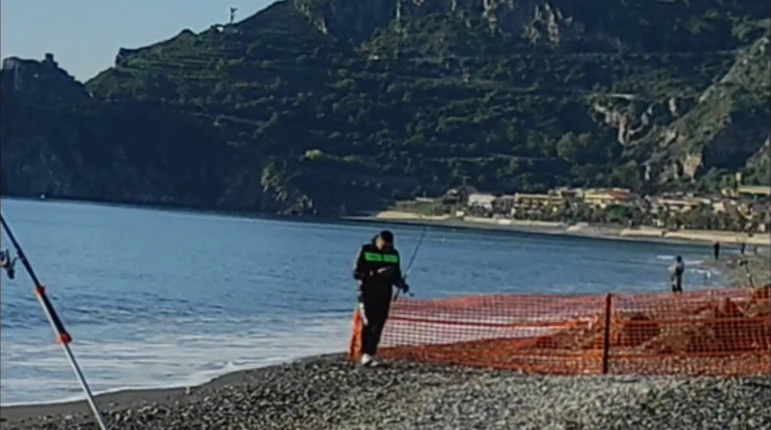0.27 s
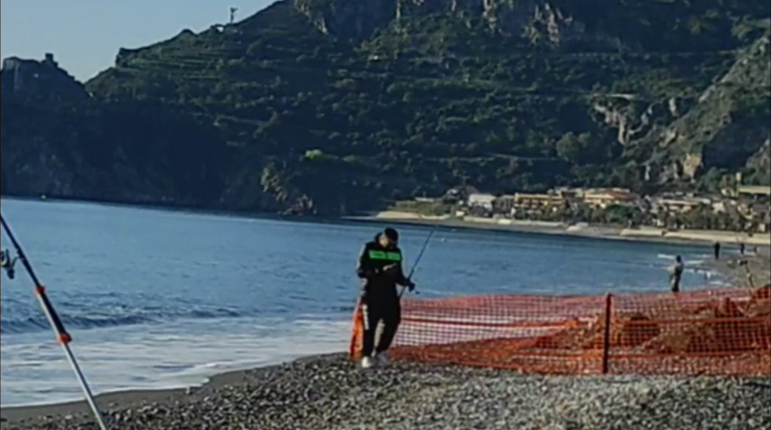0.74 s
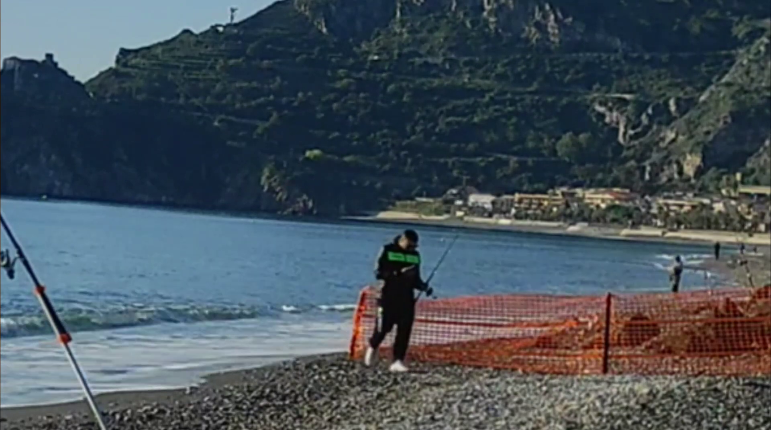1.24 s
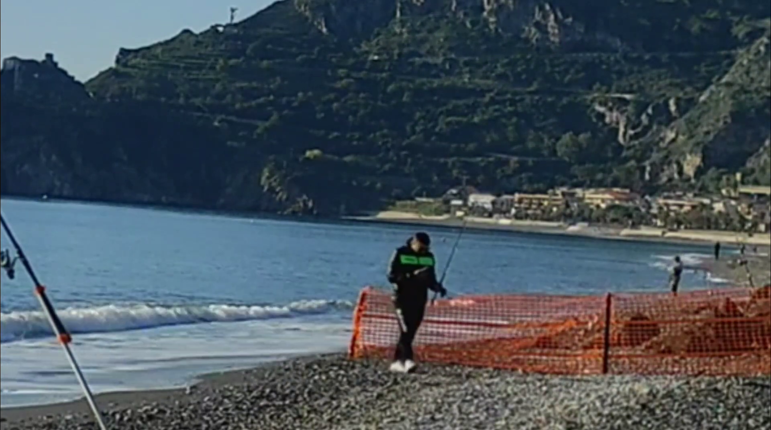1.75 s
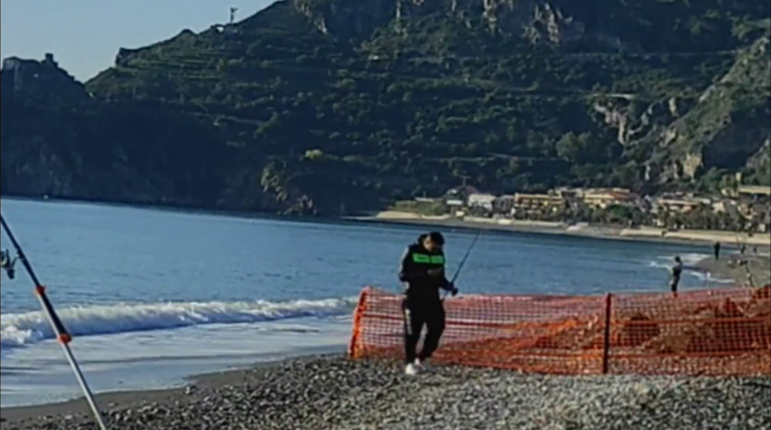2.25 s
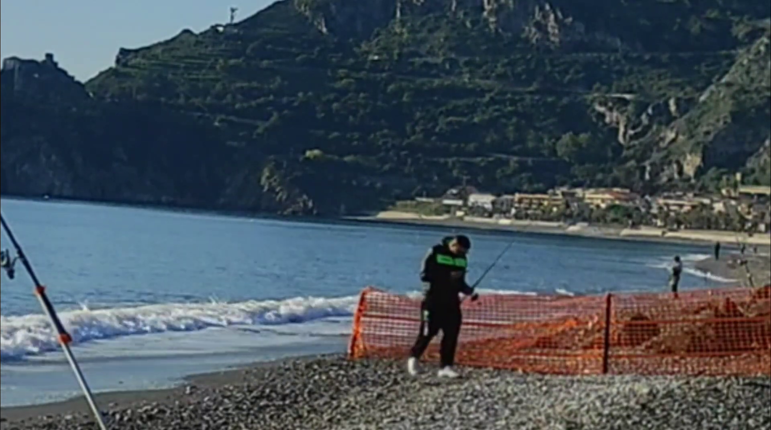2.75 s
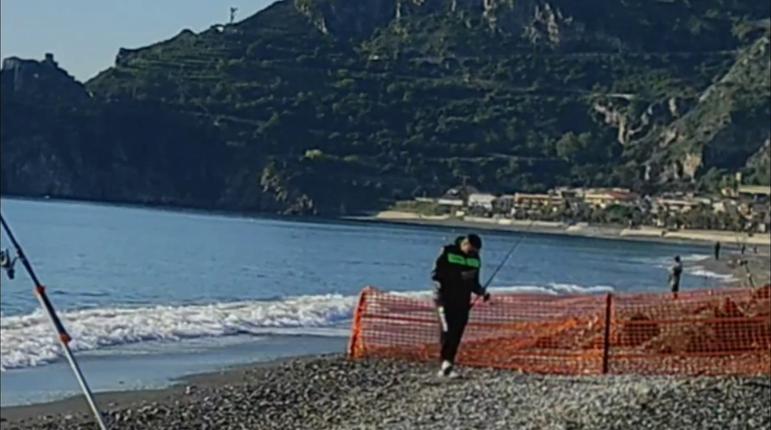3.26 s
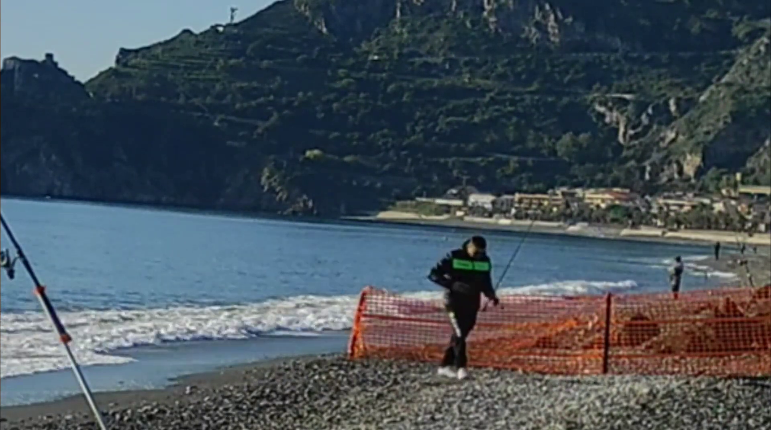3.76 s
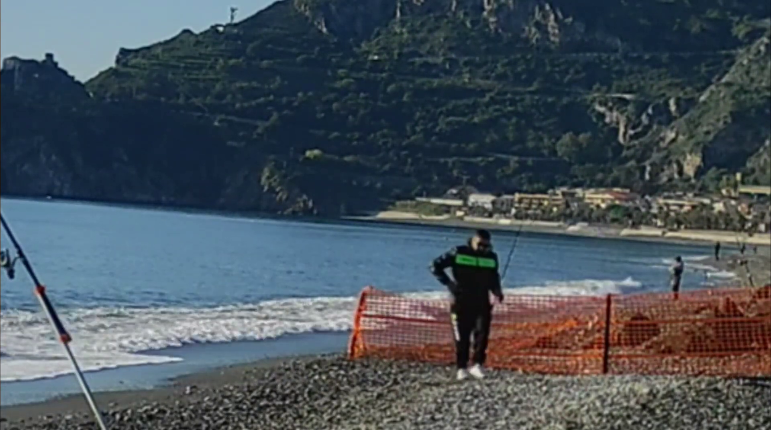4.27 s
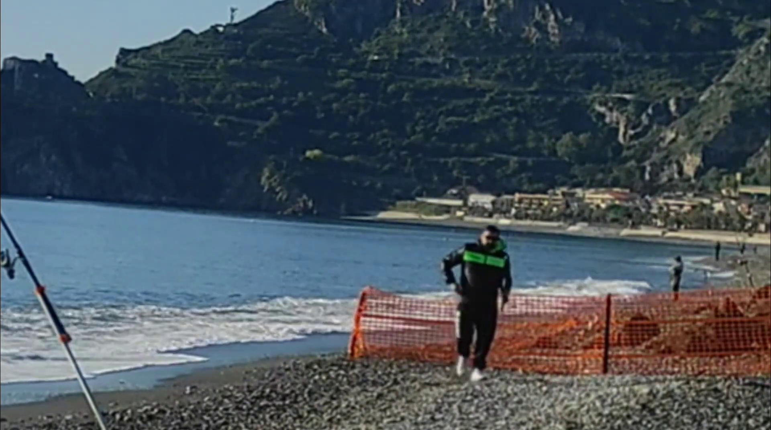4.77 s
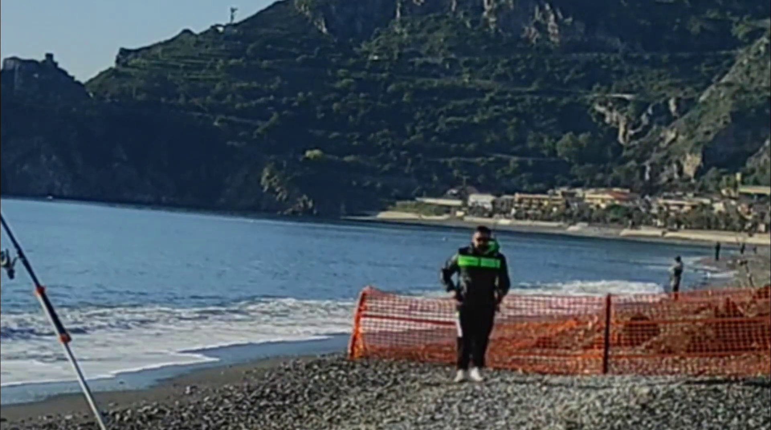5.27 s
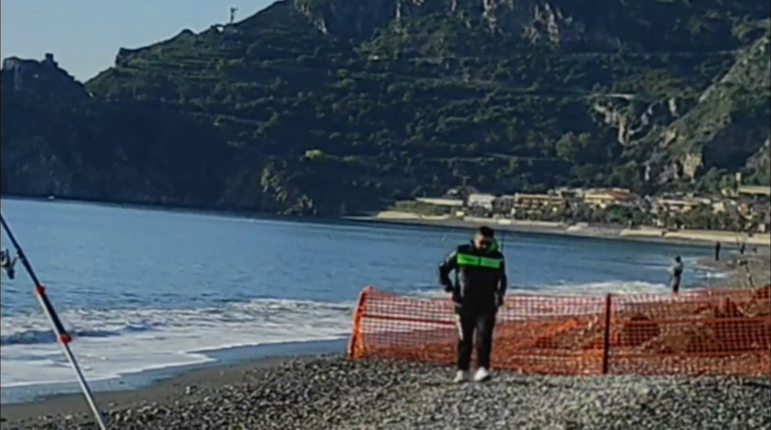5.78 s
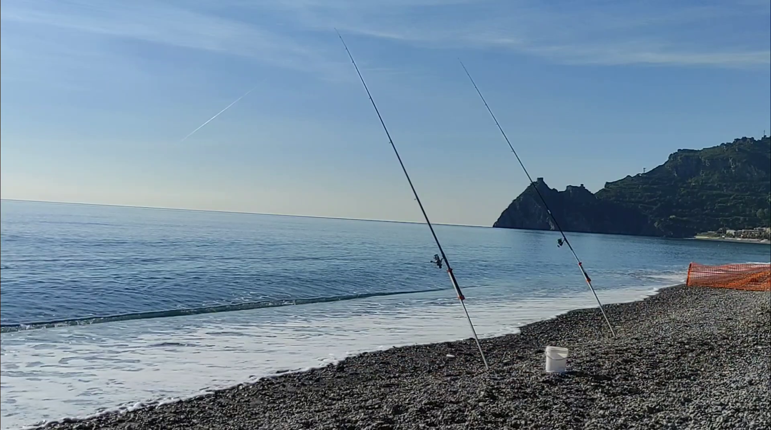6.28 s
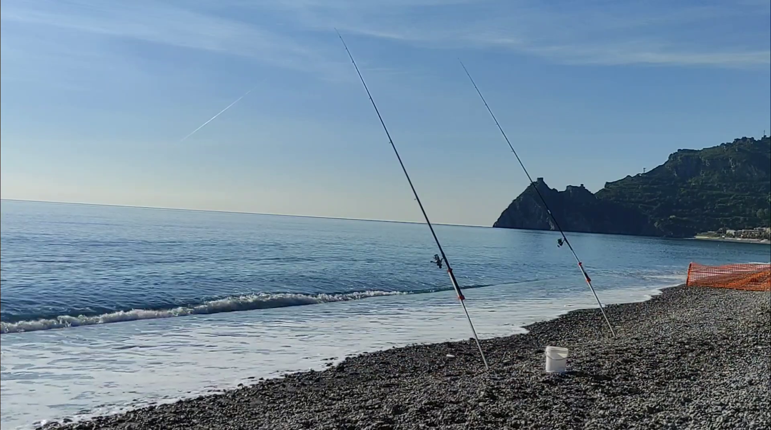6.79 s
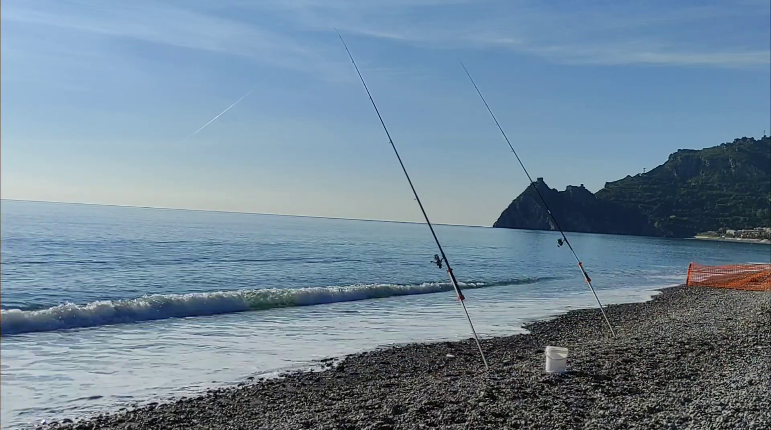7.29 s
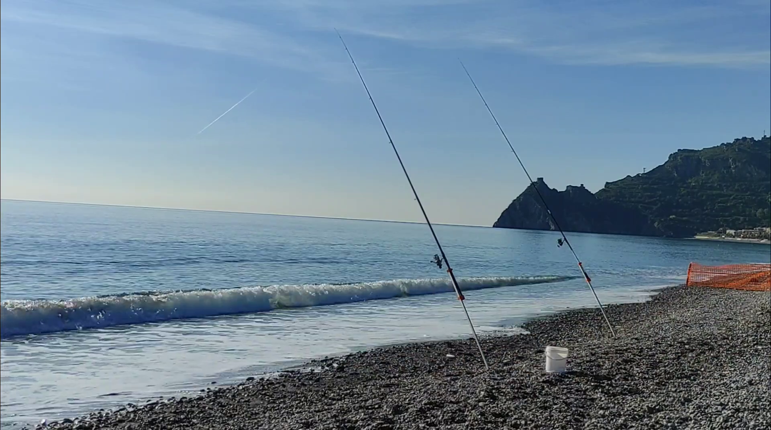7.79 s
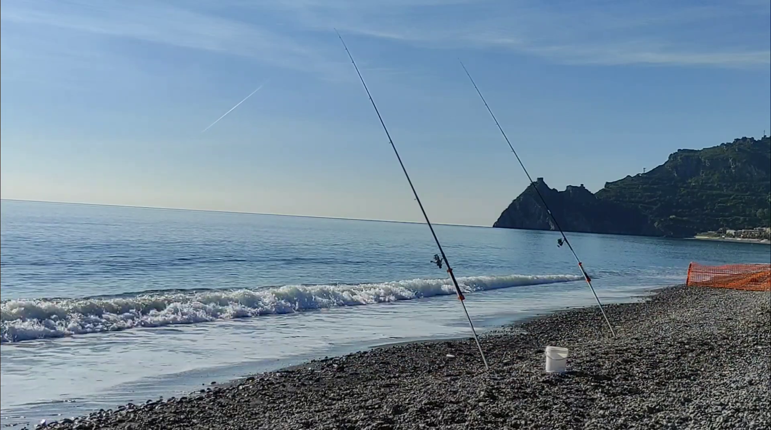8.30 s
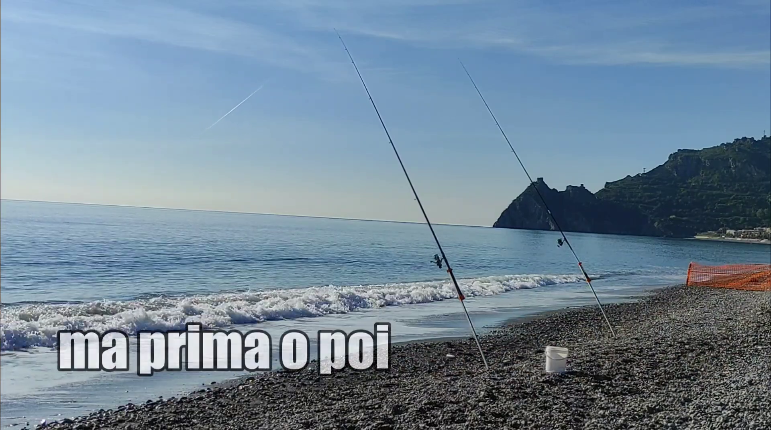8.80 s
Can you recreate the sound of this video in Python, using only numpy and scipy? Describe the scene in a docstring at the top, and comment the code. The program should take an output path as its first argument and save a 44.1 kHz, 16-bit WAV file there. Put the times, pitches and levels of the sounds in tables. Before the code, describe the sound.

Small sea waves break and roar on a pebble beach, foam hissing and fizzing through the stones, with a split-second dropout before the last waves.

```python
"""A breaker booms and roars with trapped air, a few metres off a pebble beach; more small waves follow it.
Foam hisses up the shingle, fizzes between the stones and rolls pebbles up and back; a crest peels along the shore.
Clouds of bubbles are shaped noise; single bubbles and stones are short decaying rings.
The near surf lies to the right of a two-port microphone, the bay ahead, with a light breeze on both ports.
The sound drops out for an instant near 6.06 s, before the last waves."""
import sys
import numpy as np
from scipy import signal
from scipy.fft import rfft, irfft, next_fast_len
from scipy.io import wavfile

SR = 44100
rng = np.random.default_rng(int(sys.argv[2]) if len(sys.argv) > 2 else 0)


def store_wav(level_fs):
    """Save 16-bit WAV to argv[1]."""
    pcm = np.round(np.clip(np.atleast_2d(level_fs), -1, 1) * 32767)
    wavfile.write(sys.argv[1], SR, pcm.T.astype(np.int16))


N = 398663

# Source levels are those ahead of the microphone colour and the gain curve in record().
# Breakers a few metres off. Each row: breaks at in seconds, fullest at in seconds, starts to ebb at in seconds,
# first rise in dB per second (on top of the build-up), build-up in dB per second,
# boom of large air pockets in dB, roar of bubbles in dB, pitch of the roar as a factor.
BREAKERS = [(0.0, 0.95, 0.97, 41, 3.5, -45, -33.5, 0.94), (4.48, 5.88, 7.2, 90, 5.3, -47.3, -34, 1.0),
            (6.835, 6.97, 6.94, 80, 4, -46, -38.5, 0.91), (7.58, 7.75, 7.7, 60.5, 14, -52, -38, 0.85),
            (8.1, 8.6, 8.68, 33, 9, -39.3, -29.5, 0.9)]
# Large air pockets collapsing in a breaker. Each row: centre in seconds, level in dB, pitch in Hz,
# half length in seconds.
AIR_POCKETS = [(0.04, -37, 445, 0.06), (0.11, -41.5, 171, 0.08), (0.42, -43, 166, 0.07),
               (0.78, -44, 175, 0.07), (0.94, -40, 320, 0.052), (1.13, -41, 320, 0.04),
               (1.3, -43, 199, 0.039), (1.51, -43.5, 271, 0.08), (1.98, -49, 436, 0.13),
               (4.6, -41.5, 190, 0.06), (4.93, -42.5, 270, 0.12), (5.33, -45.5, 260, 0.13),
               (5.62, -49, 181, 0.07), (5.81, -45, 400, 0.09), (6.0, -47, 210, 0.041),
               (6.76, -47, 330, 0.035), (6.86, -43.5, 480, 0.033), (7.0, -45, 250, 0.08),
               (8.0, -48, 180, 0.05), (8.46, -40, 220, 0.07), (8.75, -35.5, 250, 0.069),
               (9.02, -36, 272, 0.07)]
# The lip of a crest spilling with a light splash. Each row: centre in seconds, level in dB, pitch in Hz,
# half length in seconds.
LIP_SPILLS = [(4.44, -46.5, 800, 0.09), (6.6, -50.5, 950, 0.11), (7.82, -43, 900, 0.12)]
# Waves running up the beach. Each row: arrives at in seconds, fullest at in seconds, starts to drain at in
# seconds, lag of the foam in seconds, foam in dB, fizz in the shingle in dB.
RUN_UPS = [(-0.3, 0.104, 0.28, 0.1, -37, -32.5), (0.8, 1.13, 1.03, 0.37, -42.5, -38),
           (3.2, 3.3, 2.82, 0.15, -56, -49.5), (4.302, 5.1, 5.55, 0.24, -39.5, -36),
           (6.524, 8.38, 8.7, 0.23, -37.5, -34)]
# Wash left between waves, one row before the drop-out and one after.
# Each row: boom in dB, roar in dB, foam in dB, fizz in dB.
LULL_WASH = [(-58.5, -51.5, -53.5, -53.4), (-63, -58, -56.8, -53)]
# Stones dragged down the slope. Each row: centre in seconds, level in dB, half length in seconds.
STONE_DRAGS = [(4.303, -49.5, 0.12), (6.873, -48, 0.25)]
# Place of the near surf. Each row: time in seconds, lead of the right port in ms, spread of that lead in ms.
SURF_BEARING = [(0, 0.5, 0.1), (1.1, 0.39, 0.14), (2.1, 0.26, 0.11), (2.8, 0.12, 0.19), (3.6, 0.44, 0.058),
                (4.25, 0.42, 0.045), (4.8, 0.43, 0.13), (6.03, 0.45, 0.13), (6.08, 0.27, 0.2),
                (6.6, 0.26, 0.074), (7.3, 0.2, 0.1), (8.0, 0.17, 0.27), (9.0, 0.41, 0.099)]
# Crest breaking further along the shore, straight ahead. Each row: time in seconds, level in dB.
FAR_CREST = [(0, -66), (1.6, -50), (2.15, -47.8), (2.55, -51), (3.0, -50.5), (3.6, -50), (4.1, -55),
             (4.8, -64)]

# Spectra in the open air; only their shape counts. Each row: frequency in Hz, relative level in dB per Hz.
BOOM_SPECTRUM = [(20.0, -25.1), (45.0, -26), (75.0, -6), (115.0, -13.5), (170.0, -1.5), (240.0, -6.5),
                 (340.0, -4.5), (600.0, -12.5), (1500.0, -50.0)]
ROAR_SPECTRUM = [(100.0, -39), (210.0, -5.5), (330.0, -3), (470.0, -2), (780.0, -4.5), (1080.0, -4.5),
                 (1450.0, -10), (2200.0, -16.5), (5000.0, -33.5)]
FOAM_SPECTRUM = [(300.0, -32), (700.0, -6), (1100.0, -1.5), (1500.0, -0.5), (2200.0, -3), (3200.0, -8),
                 (5000.0, -14.5), (10000.0, -25)]
FIZZ_SPECTRUM = [(700.0, -20), (1800.0, 0.5), (3000.0, -3.5), (4200.0, -0.04), (9000.0, 0.5), (15000.0, 1),
                 (17000.0, -30.0)]
RATTLE_SPECTRUM = [(1500.0, -13), (2700.0, 0.5), (4500.0, -2.5), (7000.0, -7)]  # dragged stones
FAR_SPECTRUM = [(40.0, -21), (120.0, -4), (300.0, 0.5), (500.0, 3.5), (1000.0, -3.5), (2000.0, -4.5),
                (3200.0, -12), (8000.0, -51)]  # crest along the shore
RUMBLE_SPECTRUM = [(20.0, 4.5), (50.0, -1.5), (100.0, -3), (200.0, -1), (500.0, -23), (2000.0, -33)]  # sea of the whole bay

# Colour of the microphone ports, each with its own cavity resonance. Each row: frequency in Hz, gain in dB.
LEFT_PORT = [(20.0, -6.5), (300.0, -3), (1000.0, -3), (2200.0, -5.5), (3200.0, -6.5), (4500.0, -11.5),
             (7200.0, -9.8), (8150.0, -3.5), (8400.0, -0.2), (9100.0, -1.5), (9450.0, -10), (9620.0, -24),
             (9850.0, -10.4), (10400.0, -18.5), (11000.0, -19.5), (15000.0, -36)]
RIGHT_PORT = [(20.0, -4), (5000.0, 1.47), (6000.0, 4.5), (6600.0, 8), (7200.0, 12.5), (7800.0, 6.5),
              (8400.0, 2), (9150.0, -3), (9450.0, -10.5), (9620.0, -25), (9850.0, -8.5), (10400.0, -18.5),
              (11000.0, -15.5), (15000.0, -25)]
# Gain through the brief drop-out; the first and last values hold outwards. Each row: time in seconds, gain in dB.
DROPOUT_GAIN = [(6.030, 4), (6.034, -23), (6.058, -44), (6.066, -29), (6.074, -0.5), (6.082, 3)]

DROPOUT_S = 6.055
EDGE_HZ = 15200  # upper band limit
RUMBLE_DB = -59.5
ROAR_EBB_DB, BOOM_EBB_DB = 9, 15  # fall in the first second of the ebb
FIZZ_EBB_DB, FOAM_EBB_DB = 6.5, 7.1  # fall in the first second of draining
EBB_POWER = 1.43  # the fall speeds up as the water drains
# the run-up: first rush (on top of the climb), then the slower climb of fizz and of foam
RUSH_DB_PER_S, CLIMB_DB_PER_S, FOAM_CLIMB_DB_PER_S = 62, 7, 7
# a crest first spills small bubbles: share by which its roar is higher as it breaks, and settling time
SPILL_RISE, SPILL_S = 0.072, 0.47
POCKET_OCTAVES, SPILL_OCTAVES = 0.6, 0.53  # spread of the bubble pitches in one burst

FRAME, HOP = 1024, 256  # samples
TIME = np.arange(N) / SR
FRAME_TIME = np.arange(N // HOP + 5) * HOP / SR
BINS = np.fft.rfftfreq(FRAME, 1 / SR)  # Hz


def surf():
    """The crest folds over: air pockets boom, bubble clouds roar, foam hisses and fizzes between the stones."""
    boom_db, roar_db, foam_db, fizz_db = surf_levels(FRAME_TIME)
    power = layer(boom_db, BOOM_SPECTRUM)
    power = power + layer(roar_db, ROAR_SPECTRUM, roar_pitch(FRAME_TIME))
    power = power + layer(foam_db, FOAM_SPECTRUM) + layer(fizz_db, FIZZ_SPECTRUM)
    power = power + splashes(AIR_POCKETS, POCKET_OCTAVES) + splashes(LIP_SPILLS, SPILL_OCTAVES)
    lead_ms, spread_ms = follow(SURF_BEARING, FRAME_TIME)
    return water(power, lead_ms, spread_ms, focus=0.29, patchy_db=1.08, flicker_db=0.21, rate_hz=27)


def surf_levels(t):
    """Boom, roar, foam and fizz in dB at times t: the waves add up in power over the wash of the lulls."""
    after = (t > DROPOUT_S).astype(int)
    boom, roar, foam, fizz = (gain_of(LULL_WASH) ** 2)[after].T
    for start, fullest, ebb, rise, build, boom_db, roar_db, _ in BREAKERS:
        boom = boom + gain_of(boom_db) ** 2 * swell(t, start, fullest, ebb, rise, build, BOOM_EBB_DB)
        roar = roar + gain_of(roar_db) ** 2 * swell(t, start, fullest, ebb, rise, build, ROAR_EBB_DB)
    for start, fullest, drain, lag, foam_db, fizz_db in RUN_UPS:
        # the foam gathers behind the fizzing edge of the water
        foam_swell = swell(t, start + lag, fullest + lag, drain + lag,
                           RUSH_DB_PER_S, FOAM_CLIMB_DB_PER_S, FOAM_EBB_DB)
        fizz_swell = swell(t, start, fullest, drain, RUSH_DB_PER_S, CLIMB_DB_PER_S, FIZZ_EBB_DB)
        foam = foam + gain_of(foam_db) ** 2 * foam_swell
        fizz = fizz + gain_of(fizz_db) ** 2 * fizz_swell
    return 10 * np.log10([boom, roar, foam, fizz])


def swell(t, start, fullest, ebb, attack_db_per_s, build_db_per_s, ebb_db):
    """Power of one wave: quick attack, slow build-up, ebb. No wave carries across the drop-out."""
    attack = attack_db_per_s * np.maximum(start - t, 0)
    build = build_db_per_s * np.maximum(fullest - t, 0)
    fall = ebb_db * np.maximum(t - ebb, 0) ** EBB_POWER
    same_side = (t > DROPOUT_S) == (start > DROPOUT_S)
    return gain_of(-(attack + build + fall)) ** 2 * same_side


def roar_pitch(t):
    """The roar takes the pitch of the loudest breakers; each starts high and sinks as its bubbles grow."""
    weights, pitches = [], []
    for start, fullest, ebb, rise, build, _, roar_db, pitch in BREAKERS:
        power = gain_of(roar_db) ** 2 * swell(t, start, fullest, ebb, rise, build, ROAR_EBB_DB)
        weights.append(power + 1e-12)
        settling = np.exp(-np.maximum((t - start) / SPILL_S, -1))
        pitches.append(pitch * (1 + SPILL_RISE * settling))
    return np.average(pitches, axis=0, weights=weights)


def splashes(rows, octaves):
    """Power over (frames, bins) of short bursts of bubbles, each around its own pitch."""
    power = 0
    for when, db, hz, half_s in rows:
        shape = hump(np.log2((BINS + 1) / hz), 0, octaves)
        burst = hump(FRAME_TIME, when, half_s)
        power = power + gain_of(db) ** 2 * np.outer(burst, shape / shape.sum())
    return power


def gurgle():
    """Single large bubbles ring in the breaker, rising in pitch as they surface."""
    roar_db = np.interp(TIME, FRAME_TIME, surf_levels(FRAME_TIME)[1])
    bubbles = grains(ROAR_SPECTRUM, low_hz=252.0, high_hz=1522, per_s=200, cycles=4.2, glide=0.026,
                     size_db=0.5, scatter_ms=0.15, size=2560)
    return gain_of(roar_db - 11.0) * bubbles


def foam_bubbles():
    """Small bubbles pop and tinkle on the sheet of foam, as brief rings that rise slightly in pitch."""
    foam_db = np.interp(TIME, FRAME_TIME, surf_levels(FRAME_TIME)[2])
    bubbles = grains(FOAM_SPECTRUM, low_hz=806.5, high_hz=5900, per_s=420, cycles=19.0, glide=0.008,
                     size_db=3.0, scatter_ms=0.31, size=2048)
    return gain_of(foam_db - 10.5) * bubbles


def pebbles():
    """Stones rolled by the swash click against each other, following the fizz."""
    fizz_db = np.interp(TIME, FRAME_TIME, surf_levels(FRAME_TIME)[3])
    clicks = grains(FIZZ_SPECTRUM, low_hz=1810, high_hz=11100, per_s=1200, cycles=6.5, glide=0,
                    size_db=2.5, scatter_ms=0.4, size=192)
    return gain_of(fizz_db - 17.0) * clicks


def backwash():
    """Stones knock together as the retreating water drags them down the slope."""
    level = sum(gain_of(db) * np.sqrt(hump(TIME, when, half_s)) for when, db, half_s in STONE_DRAGS)
    knocks = grains(RATTLE_SPECTRUM, low_hz=1820, high_hz=6970, per_s=3000, cycles=4.7, glide=0,
                    size_db=2.0, scatter_ms=0.44, size=192)
    return level * knocks


def bay():
    """A crest breaks on along the shore, dulled by distance, over the steady low rumble of the sea."""
    crest_db = follow(FAR_CREST, FRAME_TIME)[0]
    power = layer(crest_db, FAR_SPECTRUM) + layer(RUMBLE_DB, RUMBLE_SPECTRUM)
    return water(power, lead_ms=-0.063, spread_ms=0.076, focus=0.28, patchy_db=0.0, flicker_db=-1.0, rate_hz=21)


def breeze():
    """A light breeze brushes each port on its own: independent noise in the deep bass."""
    low_pass = signal.butter(2, 38, fs=SR, output="sos")
    return gain_of(-65) * evened(signal.sosfilt(low_pass, rng.standard_normal((2, N))))


def water(power, lead_ms, spread_ms, focus, patchy_db, flicker_db, rate_hz):
    """Countless bubbles bursting in clouds along a stretch of surf, as they reach the two ports."""
    right, other = rng.standard_normal((2, len(FRAME_TIME), 2 * len(BINS))).view(complex)
    radians_per_ms = 2 * np.pi * BINS / 1000
    blur = np.outer(spread_ms, radians_per_ms)
    # a wide source is alike at both ports only in the bass; its near end (share: focus) stays alike higher up
    near_end = np.exp(-0.8j * blur) / np.sqrt(1 + blur ** 2 / 4)
    share = np.clip(focus, 0, 1)
    same = (1 - share) * np.exp(-blur ** 2 / 2) + share * near_end
    same = same * (1 - 0.19 * BINS ** 2 / (BINS ** 2 + 700 ** 2))  # the stones scatter all but the bass
    left = same * right + np.sqrt(abs(1 - abs(same) ** 2)) * other
    left = left * np.exp(-1j * np.outer(lead_ms, radians_per_ms))  # left hears it later
    # big bubbles are few and come in lumps, small ones are many and even out
    lumpy = (1 + BINS / 700) ** -0.1
    patches = patchy_db * churn(rate_hz, count=80)
    flicker = flicker_db * churn(rate_hz, count=1)
    frames = np.array([left, right]) * (np.sqrt(power) * gain_of(lumpy * (patches + flicker)))
    _, sound = signal.istft(frames, nperseg=FRAME, noverlap=FRAME - HOP, time_axis=1, freq_axis=2)
    return np.sqrt(3 / 2) * sound[:, :N]  # makes up for the overlap of independent frames


def churn(rate_hz, count):
    """A smooth random field over (frames, bins), with count independent bands, rms about 1."""
    white = rng.standard_normal((count, len(FRAME_TIME)))
    slow = np.exp(-(np.fft.rfftfreq(len(FRAME_TIME), HOP / SR) / rate_hz) ** 2)
    bands = evened(irfft(rfft(white) * slow, len(FRAME_TIME)))
    place = np.sqrt(BINS / BINS[-1]) * (count - 1)  # bands widen towards the treble
    nearness = np.maximum(1 - abs(place - np.arange(count)[:, None]), 0)
    return bands.T @ np.sqrt(nearness)


def layer(level_db, spectrum, pitch=1):
    """Power over (frames, bins) of one kind of water noise; pitch scales its frequencies."""
    shape = gain_of(read(spectrum, BINS / np.reshape(pitch, (-1, 1)))) ** 2
    level = np.reshape(gain_of(level_db) ** 2, (-1, 1))
    return level * shape / shape.sum(1, keepdims=True)


def grains(spectrum, low_hz, high_hz, per_s, cycles, glide, size_db, scatter_ms, size):
    """Single short rings of random pitch and strength, each from its own place in the surf, rms 1."""
    own_rng = np.random.default_rng(rng.integers(2 ** 31))
    when, pitch, strength, place = own_rng.random((int(per_s * N / SR), 4)).T
    hz = low_hz * (high_hz / low_hz) ** pitch
    turns = np.outer(hz, np.arange(size) / SR)
    extra_db = size_db * np.minimum(-np.log(1 - strength), 4)  # a few stand out
    height = hz * gain_of(read(spectrum, hz) + extra_db)
    fade = (1 - np.exp(-turns)) * np.exp(-turns / cycles)  # swells within one cycle, then dies away
    rings = height[:, None] * fade * np.sin(2 * np.pi * turns * (1 + glide * turns / cycles))
    lead_ms = follow(SURF_BEARING, when * N / SR)[0] + scatter_ms * (2 * place - 1)
    ports = []
    for start in (when * N + lead_ms * SR / 1000, when * N):  # left, right
        at = abs(start).astype(int)[:, None] + np.arange(size)
        ports.append(np.bincount(at.ravel(), rings.ravel(), N)[:N])
    return evened(np.array(ports))


def gain_of(db):
    """Decibels to amplitude."""
    return 10 ** (np.asarray(db) / 20)


def evened(x):
    """Scales to rms 1."""
    return x / np.sqrt(np.mean(x ** 2) + 1e-20)


def hump(x, centre, half_width):
    """A bell curve of height 1."""
    return np.exp(-((x - centre) / half_width) ** 2)


def read(points, hz):
    """A spectrum table in dB, read on a log-frequency axis."""
    f, value = np.transpose(points)
    return np.interp(np.log(hz + 1), np.log(f + 1), value)


def follow(rows, t):
    """The columns of a curve table at times t."""
    s, *columns = np.vstack(rows).T
    return [np.interp(t, s, column) for column in columns]


def scene():
    """Near surf to the side, the bay ahead, the breeze at the ports."""
    near = surf() + gurgle() + foam_bubbles() + pebbles() + backwash()
    return near + bay() + breeze()


def record(dry):
    """Colours each port by its resonance, applies the gain with its brief drop-out, then limits the band."""
    size = next_fast_len(N + FRAME)
    hz = np.fft.rfftfreq(size, 1 / SR)
    ports = gain_of([read(LEFT_PORT, hz), read(RIGHT_PORT, hz)])
    coloured = irfft(rfft(dry, size) * ports, size)[:, :N]
    heard = coloured * gain_of(follow(DROPOUT_GAIN, TIME)[0])
    low_pass = signal.firwin(511, EDGE_HZ, window=("kaiser", 9), fs=SR)
    return signal.oaconvolve(heard, low_pass[None], "same")


dry = scene()
out = record(dry)
store_wav(out)
```